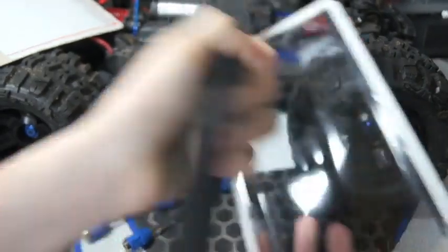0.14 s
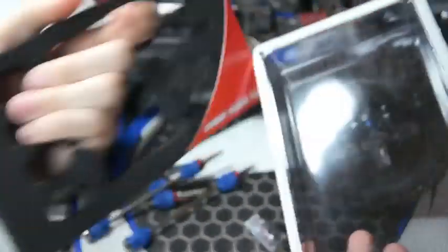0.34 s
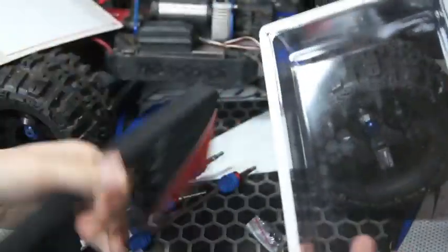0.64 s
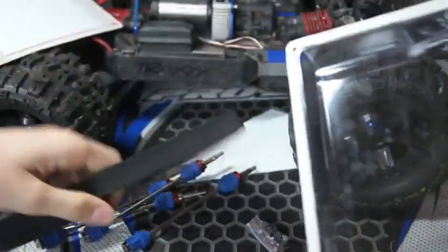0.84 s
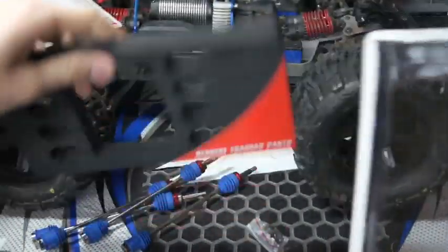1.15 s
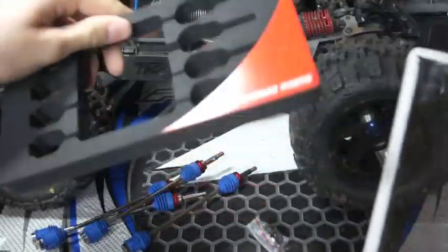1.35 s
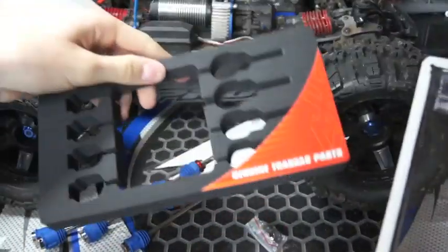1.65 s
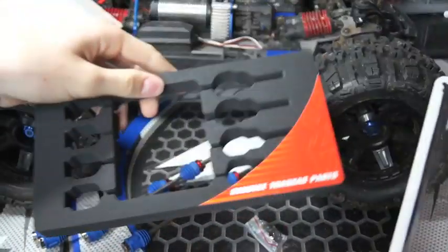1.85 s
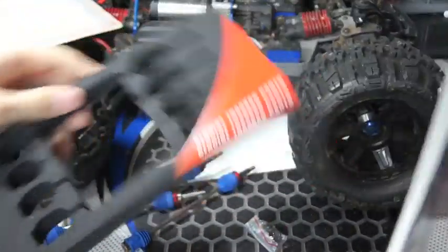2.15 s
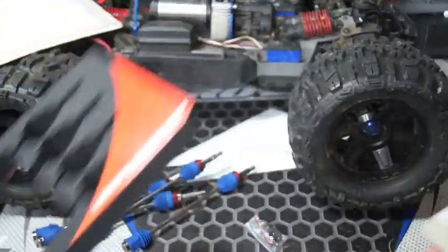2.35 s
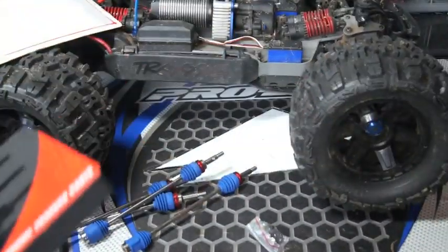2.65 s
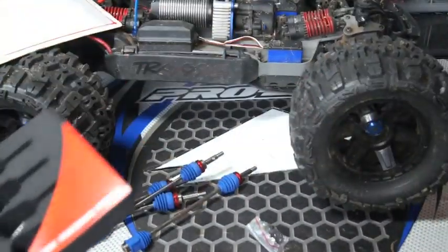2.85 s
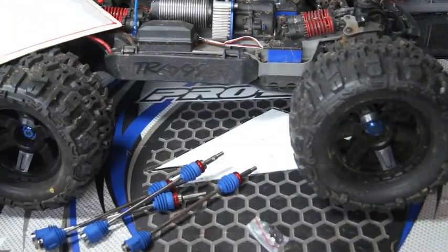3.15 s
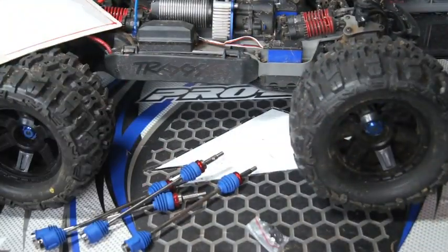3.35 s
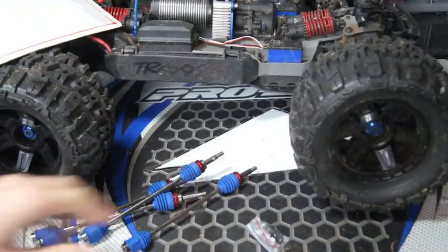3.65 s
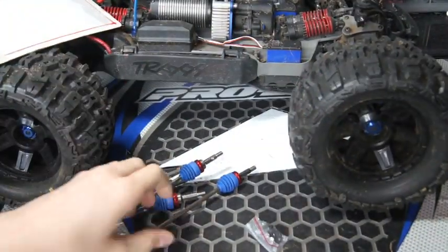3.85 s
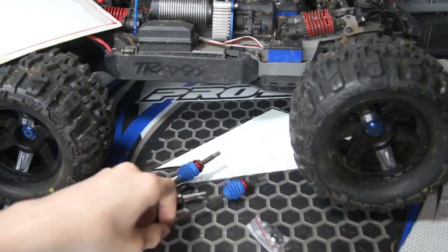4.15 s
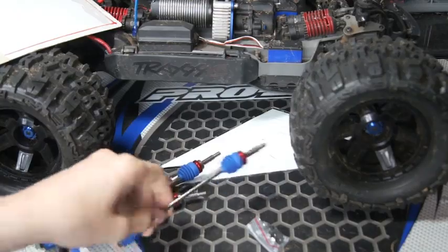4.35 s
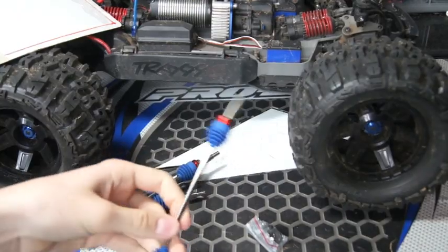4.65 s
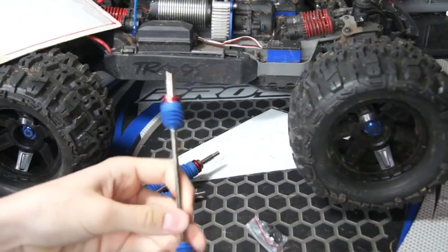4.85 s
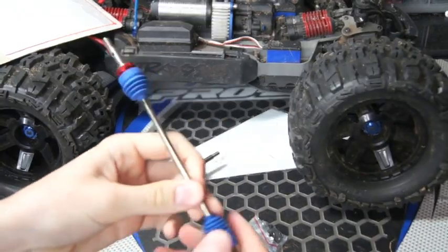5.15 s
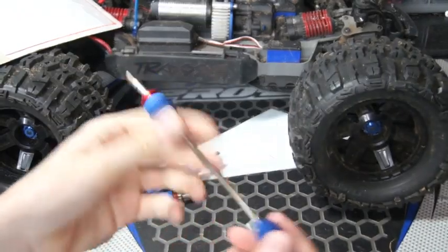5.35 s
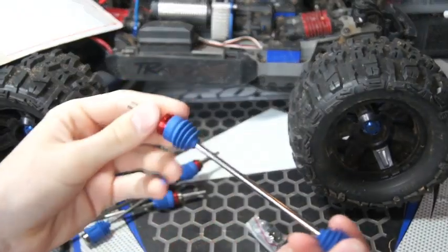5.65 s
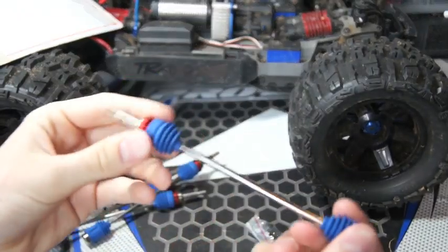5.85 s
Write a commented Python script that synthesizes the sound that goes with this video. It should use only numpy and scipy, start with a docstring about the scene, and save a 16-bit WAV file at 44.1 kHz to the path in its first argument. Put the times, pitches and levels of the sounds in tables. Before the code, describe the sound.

Hands slide a foam tray from a thin plastic cover, small mechanical clicks follow, then the cover drops with a loud clatter and rattles still.

```python
"""Faint fan-like air, hiss, hum and thin electrical whine run throughout a small, quiet room.
From 0.16 s hands slide a foam tray out of a plastic cover: grainy noise, taps, and cracks with ringing modes.
From 0.22 s a close mechanism, likely the camera's focus drive, clicks, whirs (fluttering noise) and bumps.
At 3 s the cover drops, flexes and puffs out air, then rocks to rest in shrinking, weakening contacts.
From 4.95 s the focus hunts in short rough whines; near 5.7 s the grip shifts dully on a steel shaft."""
import sys
import numpy as np
from scipy import signal
from scipy.fft import rfft, irfft
from scipy.io import wavfile
from scipy.ndimage import uniform_filter1d

SR = 44100
rng = np.random.default_rng(int(sys.argv[2]) if len(sys.argv) > 2 else 0)


def file_out(sig):
    """Save sig as 16-bit WAV at sys.argv[1]."""
    # one column per channel
    cols = np.atleast_2d(sig).T
    # limit, then scale
    lim = np.clip(cols, -1, 1)
    pcm = np.round(lim * 32767).astype(np.int16)
    wavfile.write(sys.argv[1], SR, pcm)


N = 264600
TIME_S = np.arange(N) / SR
HIT_SIZE = 8192  # samples
HIT_TIME_S = np.arange(HIT_SIZE) / SR


def amp(db):
    """Decibels to gain."""
    return 10 ** (np.asarray(db) / 20)


def unit(x):
    """Scales to an rms of one."""
    return x / np.sqrt(np.mean(x ** 2) + 1e-20)


def read(points, hz):
    """Reads a table on a log-frequency axis."""
    point_hz, value = np.transpose(points)
    return np.interp(np.log(hz + 1), np.log(point_hz + 1), value)


def pan(right_db):
    """Gains of the two channels; right_db is right minus left."""
    return amp(np.array([[-right_db], [right_db]]) / 2)


def add(mix, start_s, sound):
    """Mixes a sound in at start_s."""
    part = mix[:, max(round(start_s * SR), 0):][:, :sound.shape[-1]]
    part += sound[..., :part.shape[1]]


def bass_cut(x, hz, order=4):
    """Small, light parts radiate almost no bass."""
    return signal.sosfilt(signal.butter(order, hz, "highpass", fs=SR, output="sos"), x)


def slow_wobble(size, window):
    """Smoothed unit-rms noise that drives uneven motion."""
    return unit(uniform_filter1d(rng.standard_normal(size), size=window))


def dying(t_s, t60_s):
    """A decay of 60 dB in t60_s."""
    return np.exp(-np.log(1000) * np.maximum(t_s, 0) / np.maximum(t60_s, 1e-3))


# left-right likeness of noise: pitch_hz, likeness_share
LIKENESS = [(40, 0.32), (130, 1), (600, 0.85), (1000, 0.78), (1700, 0.093), (3000, 0.23), (7000, 0.027)]


def noise(spectrum, size, tilt_db=0, likeness=1):
    """Two channels of coloured noise, more alike in the bass than in the treble; tilt in dB per octave."""
    hz = np.fft.rfftfreq(size, 1 / SR)
    left, other = np.exp(2j * np.pi * rng.random((2, len(hz))))
    same = np.clip(likeness * read(LIKENESS, hz), 0, 1)
    right = same * left + np.sqrt(1 - same ** 2) * other
    octaves = np.log2(np.clip(hz, 500, 8000) / 1000)
    gain = amp(read(spectrum, hz) + tilt_db * octaves)
    return unit(irfft(np.array([left, right]) * gain, size))


def burst(spectrum, t60_s, tilt_db=0, likeness=1, bass_hold=0.21):
    """A contact: dense vibration with a very fast onset; its treble dies sooner than its bass."""
    hz, t_s, bands = signal.stft(noise(spectrum, HIT_SIZE, tilt_db, likeness), SR, nperseg=128)
    band_t60_s = t60_s * ((hz[:, None] + 300) / 1500) ** -bass_hold
    x = signal.istft(bands * dying(t_s, band_t60_s), SR, nperseg=128)[1]
    t_s = np.arange(x.shape[1]) / SR
    x = x * (1 - np.exp(-t_s / 0.00026))
    return x * np.linalg.norm(dying(t_s, t60_s)) / np.linalg.norm(x)


# echo decay: pitch_hz, t60_s
ROOM_DECAY = [(100, 0.4), (400, 0.44), (1000, 0.42), (3000, .36), (8000, 0.44), (15000, .17)]


def room(x):
    """Diffuse echoes from nearby walls, each band dying at its own speed."""
    hz, t_s, bands = signal.stft(noise([(20, 0), (20000, 0)], size=32768), SR, nperseg=256)
    tail = signal.istft(bands * dying(t_s, read(ROOM_DECAY, hz)[:, None]), SR, nperseg=256)[1]
    tail = tail * np.clip(np.arange(tail.shape[1]) / SR / 0.01, 0, 1) ** 2
    return signal.fftconvolve(x, tail / np.linalg.norm(tail[0]), axes=1)[:, :N]


# air and hiss spectrum: pitch_hz, relative_level_db_per_hz
FLOOR_SPECTRUM = [(25, -13.5), (100, -24), (170, -9.5), (240, -1), (470, 2.5), (700, -1), (1070, 0),
                  (1300, -13.5), (2100, -10.5), (3000, -13.5), (4200, -12), (5400, -17), (10000, -25.5),
                  (15000, -33)]
FLOOR_DB, HUM_HZ, HUM_RMS_DB = -53.5, 122, -82.5


def room_tone():
    """Steady fan-like air and hiss as coloured noise, plus a trace of mains hum as a sine."""
    air = amp(FLOOR_DB) * pan(0.3) * noise(FLOOR_SPECTRUM, N, likeness=0.86)
    return air + amp(HUM_RMS_DB) * np.sqrt(2) * np.sin(2 * np.pi * HUM_HZ * TIME_S)


# electrical whine bands: pitch_hz, width_hz, level_db, right_minus_left_db
WHINE_BANDS = [(1780, 70, -73.5, 3.5), (2215, 150, -69, 11.5), (3782, 34, -75, -12), (4206, 41, -69, 1.5),
               (4510, 65, -71, 2)]


def whine():
    """Thin bands of hiss from nearby electronics, unrelated at the two microphones."""
    hz = np.fft.rfftfreq(N, 1 / SR)
    white = np.exp(2j * np.pi * rng.random((2, len(hz))))
    out = np.zeros((2, N))
    for band_hz, width_hz, db, right_db in WHINE_BANDS:
        band = irfft(white / (1 + ((hz - band_hz) / width_hz) ** 2), N)
        out += amp(db) * pan(right_db) * unit(band)
    return out


SPEED_UP_SHARE = 0.59  # share of a stroke spent gathering speed


def strokes(rows):
    """Loudness of rubbing: each stroke gathers speed and slows again in a bell shape."""
    share = np.where(TIME_S < np.array(rows)[:, :1], SPEED_UP_SHARE, 1 - SPEED_UP_SHARE)
    bells = zip(rows, share)
    return sum(amp(db) * np.exp(-((TIME_S - peak_s) / (length_s * part)) ** 2)
               for (peak_s, length_s, db), part in bells)


# foam and skin on plastic: pitch_hz, relative_level_db_per_hz
RUB_SPECTRUM = [(150, -27), (400, -12), (900, -0.5), (1800, 0.5), (3000, 4), (4800, 5), (7500, -5.5),
                (13000, -8.5), (16000, -32)]


def crackle(snaps_per_s=450, spread_db=5, kinds=6):
    """Foam cells catch and let go: tiny snaps, a few of them large."""
    size_db = spread_db * np.minimum(rng.exponential(size=N), 2.8)
    snaps = (rng.random(N) < snaps_per_s / SR) * amp(size_db)
    kind = rng.integers(0, kinds, N)
    out = np.zeros((2, N))
    for k in range(kinds):
        snap = burst(RUB_SPECTRUM, 0.023, bass_hold=0.3)
        out += signal.oaconvolve((snaps * (kind == k))[None], snap, axes=1)[:, :N]
    return unit(out)


# foam and skin strokes: peak_speed_s, length_s, level_db
SLIDE_STROKES = [(.162, 0.056, -41.5), (.235, 0.093, -46), (.40, 0.15, -56.5), (.51, 0.063, -48),
                 (.935, 0.044, -58.5), (1.08, 0.23, -56), (1.39, 0.035, -56), (1.505, .07, -58),
                 (3.46, 0.18, -59.5), (3.558, 0.048, -58.5), (3.77, 0.13, -65.5), (4.06, 0.39, -59.5)]
# finger and shaft taps: start_s, level_db, brightness_db_per_octave
LIGHT_TAPS = [(.250, -45, 26), (.757, -42, 3), (1.965, -44, -10), (3.391, -42.5, 3), (3.957, -42.5, -5),
              (4.915, -47, 4), (4.958, -43.5, -1)]
# hard contact, for taps and focus clicks: pitch_hz, relative_level_db_per_hz
CLICK_SPECTRUM = [(100, -56), (250, -10.5), (480, -7), (900, 4), (1300, -6.5), (2000, -1.5), (2900, 1),
                  (4200, -4), (6000, -18.5), (10000, -26), (14000, -38)]
# grip shifts on the shaft: peak_speed_s, length_s, level_db
GRIP_SHIFTS = [(5.68, 0.3, -59.5), (5.98, 0.082, -49)]
# dull rub on shaft and rubber boot: pitch_hz, relative_level_db_per_hz
GRIP_SPECTRUM = [(40, -27), (130, -9), (350, 3), (700, 1), (1100, 2), (1800, -13), (4000, -24), (7000, -23),
                 (14000, -43)]


def hands(grain_db=2, wet_db=-9, tap_t60_s=0.057, grip_grain_db=1.0):
    """Grainy noise and snaps for sliding, single bursts for taps, slower dull noise for the grip."""
    rub = unit(noise(RUB_SPECTRUM, N) * amp(grain_db * slow_wobble(N, 90)))
    out = (rub + crackle()) * strokes(SLIDE_STROKES)
    slips = slow_wobble(N, 400)  # skin sticks and slips more slowly than foam
    out += unit(noise(GRIP_SPECTRUM, N) * amp(grip_grain_db * slips)) * strokes(GRIP_SHIFTS)
    for start_s, db, tilt_db in LIGHT_TAPS:
        add(out, start_s, amp(db) * bass_cut(burst(CLICK_SPECTRUM, tap_t60_s, tilt_db), hz=180))
    return out + amp(wet_db) * room(out)


# sheet crack: pitch_hz, relative_level_db_per_hz
CRACK_SPECTRUM = [(30, -23), (120, -75), (230, -27), (430, -8.5), (800, -3.5), (1050, -0.5), (1250, -5),
                  (1900, -5), (3000, -5), (4500, -10), (7500, -22), (13000, -31), (16000, -46.5)]


def on_spot(spot_hz, lift_db=7, octaves=0.16):
    """The crack spectrum, raised round the pitch of the spot that is struck."""
    hz = np.geomspace(20, 20000, 120)
    lift = lift_db * np.exp(-(np.log2(hz / spot_hz) / octaves) ** 2)
    return np.transpose([hz, read(CRACK_SPECTRUM, hz) + lift])


def from_right(x, delay_s=.00005):
    """Sound from the right reaches the left microphone late and with less treble."""
    hz = np.fft.rfftfreq(N, 1 / SR)
    shadow_db = -3 * hz ** 2 / (hz ** 2 + 1800 ** 2)
    left = irfft(rfft(x[0]) * amp(shadow_db) * np.exp(-2j * np.pi * hz * delay_s), N)
    return np.array([left, x[1]])


# blows on the cover: start_s, level_db, brightness_db_per_octave, spot_hz, crack_t60_s
COVER_BLOWS = [(0.1583, -23, 7.5, 4130, .04), (.162, -30, -4, 845, 0.097), (0.2162, -18.5, -1, 1010, .028),
               (.234, -28, -5.5, 980, 0.066), (0.304, -31, 0, 2840, 0.037), (2.842, -39.5, 0.5, 944, .035),
               (2.9923, -21, 19, 3770, 0.046), (2.995, -5.5, 0, 870, 0.041),
               (3.0083, -8.5, 1.5, 2960, 0.037), (3.0122, -7.5, -1.5, 3050, 0.11),
               (3.021, -12, -3.5, 950, .1), (3.029, -15, -2, 980, 0.14), (3.058, -18, -5, 990, 0.094),
               (3.105, -23, -4.5, 997, 0.14)]
# modes of the cover: pitch_hz, level_db, t60_s
COVER_MODES = [(244, -23, 0.11), (445.6, -1.5, 0.086), (525, -17, 0.083), (728, -17, 0.15),
               (749, 3.5, 0.062), (820, -8, 0.04), (876, 4.5, 0.11), (954, 2, 0.23), (1074, -0.5, 0.16),
               (1110, -21.5, .06), (1280, -9, 0.078), (1634, -8, 0.11), (1791, -2, 0.058),
               (1952, -1.5, 0.081), (2540, -17.5, 0.026), (2820, -17, 0.064), (3120, -19.5, 0.065)]
# until let go, the hand damps the cover and holds it near the microphones
LET_GO_S = 2.9
HELD_RING_DB, HELD_ROOM_DB, FREE_RING_DB, FREE_ROOM_DB = -27, -10.5, -21.5, -7
RING_GROWTH = 0.67  # dB of ringing per dB of blow: hard blows go mostly into the crack


def cover(right_db=-0.1, port_delay_s=.0001, mode_scatter_db=2, flex_wet_db=-12):
    """Each blow cracks the thin sheet and rings its modes, in a new mix for each blow; panels flex too."""
    direct, to_room = np.zeros((2, 2, N))
    t_s = HIT_TIME_S
    hz, mode_db, t60_s = np.transpose(COVER_MODES)[:, :, None]
    sign = (-1) ** np.arange(len(hz))[:, None]  # neighbouring modes swing in opposite directions
    envelope = sign * dying(t_s, t60_s) * (1 - np.exp(-t_s / 0.00034))
    modes = np.array([envelope * np.sin(2 * np.pi * hz * (t_s - lag_s)) for lag_s in (port_delay_s, 0)])
    for start_s, db, tilt_db, spot_hz, crack_t60_s in COVER_BLOWS + rocking():
        held = start_s < LET_GO_S
        ring_db, wet_db = (HELD_RING_DB, HELD_ROOM_DB) if held else (FREE_RING_DB, FREE_ROOM_DB)
        mix_db = mode_db + mode_scatter_db * rng.standard_normal(hz.shape)
        ring = (modes * amp(mix_db)).sum(1)
        crack = burst(on_spot(spot_hz), crack_t60_s, tilt_db)
        blow = amp(db) * crack + amp(ring_db + RING_GROWTH * db) * ring
        add(direct, start_s, blow)
        add(to_room, start_s, amp(wet_db) * blow)
    panels = flexes()
    wet = room(to_room + amp(flex_wet_db) * panels)
    return pan(right_db) * bass_cut(from_right(direct + panels + wet), hz=207)


# panels flexing around the time of some blows: start_s, pitch_hz, level_db, full_swing_s
PANEL_FLEXES = [(0.2151, 900, -18.5, 0.0032), (.230, 818, -29.5, 0.008), (2.9933, 738, -5.5, 0.0028),
                (3.0078, 2630, -9.5, 0.0039), (3.0093, 2980, -13, 0.0054), (3.015, 1074, -8.5, 0.012)]
# each panel drags the whole shell along, lower and more slowly
SHELL_HZ, SHELL_DB, SHELL_SLOWER = 442.7, -10.5, 1.15
# rocking contacts flex a panel too; dB relative to the contact, scatter as a share of pitch
ROCK_FLEX_DB, ROCK_SWELL_S, ROCK_PITCH_SCATTER = -4, .0022, .1


def flexes(port_delay_s=.0001):
    """A whole panel swings up and settles as a swelling sine, and the shell follows."""
    out = np.zeros((2, N))
    t_s = HIT_TIME_S
    lagged_s = t_s - np.array([[port_delay_s], [0]])
    rocks = []
    for start_s, db, _, spot_hz, _ in rocking():
        panel_hz = spot_hz * (1 + ROCK_PITCH_SCATTER * rng.standard_normal())
        rocks.append((start_s, panel_hz, db + ROCK_FLEX_DB, ROCK_SWELL_S))
    for start_s, panel_hz, panel_db, panel_swell_s in PANEL_FLEXES + rocks:
        panel = (panel_hz, panel_db, panel_swell_s)
        shell = (SHELL_HZ, panel_db + SHELL_DB, panel_swell_s * SHELL_SLOWER)
        for hz, db, swell_s in (panel, shell):
            swing = (t_s / swell_s * np.exp(1 - t_s / swell_s)) ** 3
            add(out, start_s, amp(db) * swing * np.sin(2 * np.pi * hz * lagged_s))
    return out


# modes of the drive housing: pitch_hz, level_db, t60_s
HOUSING_MODES = [(495, -17, 0.12), (674, -14, 0.027), (950, -7, 0.032), (1720, -5, 0.012),
                 (1998, -10.5, 0.035), (2816, -1.5, .022), (2890, -4, 0.026), (4200, -7, 0.009),
                 (4600, -22, 0.0092)]


def focus_click(lead_s=.007, scrape_db=-9, snap_db=-2.5, t60_s=0.036, ring_db=-1, after_db=-16,
                right_db=0.8, port_delay_s=0.00013):
    """The drive scrapes for a moment, snaps free and rings the housing; returns lead_s and the sound."""
    out = np.zeros((2, SR // 4))
    add(out, 0, amp(scrape_db) * burst(CLICK_SPECTRUM, 0.091, tilt_db=4.0, likeness=0.28))
    snap = amp(snap_db) * burst(CLICK_SPECTRUM, t60_s, likeness=0.22, bass_hold=0.27)
    after = amp(after_db) * burst(CLICK_SPECTRUM, 0.21, tilt_db=-5.0, likeness=0.14)
    add(out, lead_s, snap + after)
    since_s = np.maximum(HIT_TIME_S - np.array([[port_delay_s], [0]]), 0)
    for k, (hz, db, mode_t60_s) in enumerate(HOUSING_MODES):
        gain = (-1) ** k * amp(ring_db + db + 2 * rng.standard_normal((2, 1)))
        envelope = dying(since_s, mode_t60_s) * (1 - np.exp(-since_s / 0.00047))
        add(out, lead_s, gain * np.sin(2 * np.pi * hz * since_s) * envelope)
    return lead_s, pan(right_db) * bass_cut(out, hz=176)


# drive whir and gear buzz: pitch_hz, relative_level_db_per_hz
WHIR_SPECTRUM = [(200, -27), (450, -1), (1000, -1), (1600, -15.5), (2500, -4.5), (2850, 2), (3400, -3.5),
                 (4400, -4), (5200, -15), (14000, -30.5)]
BUMP_FROM_HZ, BUMP_TO_HZ, BUMP_WOBBLE = 490, 385, .085  # wobble: rms share of pitch


def focus_bump(length_s=.03, buzz_db=-5, buzz_peak_s=0.0086, right_db=10):
    """Braking: the gears buzz briefly, while the housing shudders in a sinking, uneven tone."""
    size = int(length_s * SR)
    uneven = slow_wobble(size, 160)
    hz = np.geomspace(BUMP_FROM_HZ, BUMP_TO_HZ, size) * (1 + BUMP_WOBBLE * uneven)
    shudder = np.sin(2 * np.pi * np.cumsum(hz) / SR) * signal.windows.tukey(size, .7) * amp(uneven - 2.0)
    u = np.arange(size) / SR / buzz_peak_s
    buzz = amp(buzz_db) * noise(WHIR_SPECTRUM, size, tilt_db=-2.5) * u * np.exp(1 - u)
    return pan(right_db) * shudder + pan(3.8) * buzz


# focus moves: start_s, click_db, stop_s, bump_db, whir_db
FOCUS_MOVES = [(.218, -50, .352, -40.5, -55), (.561, -24.5, .784, -43, -54),
               (0.932, -44.5, 1.106, -41, -65), (1.747, -22.5, 1.890, -40, -58),
               (2.598, -23.5, 2.768, -40, -56.5), (4.000, -23, 4.028, -41.5, -51.5),
               (4.132, -23.5, 4.181, -40, -52.5), (4.632, -23, 4.668, -42, -54),
               (5.193, -39, 5.238, -43, -52.5), (5.535, -50, 5.605, -60, -52.5)]


def focus_drive(flutter_db=2.5):
    """Click, a thin fluttering noise whir while the lens travels, and a bump."""
    out = np.zeros((2, N))
    for start_s, click_db, stop_s, bump_db, whir_db in FOCUS_MOVES:
        lead_s, click = focus_click()
        add(out, start_s - lead_s, amp(click_db) * click)
        size = max(int((stop_s - start_s + .012) * SR), 256)
        level_db = whir_db + np.linspace(2, -3, size) + flutter_db * slow_wobble(size, 300)
        whir = pan(3.0) * noise(WHIR_SPECTRUM, size) * signal.windows.tukey(size, .2)
        add(out, start_s, amp(level_db) * whir)
        add(out, stop_s, amp(bump_db) * focus_bump())
    return out


def air_puff(start_s=2.997, db=-58, swell_s=0.018):
    """The falling sheet pushes out a faint, deep puff of air: swelling low noise."""
    out = np.zeros((2, N))
    u = HIT_TIME_S / swell_s
    deep = noise([(15, -4), (70, 3), (110, -5), (300, -50), (16000, -90)], HIT_SIZE)
    add(out, start_s, amp(db) * deep * u * np.exp(1 - u))
    return out


# gaps shrink toward the last one; the far edge slaps down after each contact
ROCK_START_S, ROCK_FIRST_GAP_S, ROCK_LAST_GAP_S, ROCK_SHRINK = 3.128, .042, .0205, .45
FAR_EDGE_S, FAR_EDGE_DB, FAR_EDGE_BRIGHT_DB_PER_OCTAVE = .014, -5.5, -2  # delay and level after the contact
# level peaks ROCK_PEAK_S after the start, then loses ROCK_FADE_DB in ROCK_FADE_S, slowly at first
ROCK_PEAK_S, ROCK_DB, ROCK_FADE_DB, ROCK_FADE_S, ROCK_FADE_POWER = .036, -18, -14.5, .15, 1.77
ROCK_BRIGHT_DB_PER_OCTAVE, ROCK_DULLING_PER_S = 3, -31  # first brightness, and its change
ROCK_SPOT_HZ, ROCK_T60_S = 980, .034


def rocking(count=9):
    """Contacts of the cover as it rocks to rest, as rows like those of COVER_BLOWS."""
    gaps_s = ROCK_LAST_GAP_S + (ROCK_FIRST_GAP_S - ROCK_LAST_GAP_S) * ROCK_SHRINK ** np.arange(count)
    rows = []
    for age_s in np.cumsum(gaps_s) - gaps_s:
        start_s = ROCK_START_S + age_s
        db = ROCK_DB + ROCK_FADE_DB * (abs(age_s - ROCK_PEAK_S) / ROCK_FADE_S) ** ROCK_FADE_POWER
        bright_db = ROCK_BRIGHT_DB_PER_OCTAVE + ROCK_DULLING_PER_S * age_s
        rows.append((start_s, db, bright_db, ROCK_SPOT_HZ, ROCK_T60_S))
        rows.append((start_s + FAR_EDGE_S, db + FAR_EDGE_DB, FAR_EDGE_BRIGHT_DB_PER_OCTAVE,
                     ROCK_SPOT_HZ, ROCK_T60_S))
    return rows


HUNT_START_S, HUNT_EVERY_S = 4.951, .1
HUNT_FIRST_LENGTH_S, HUNT_LAST_LENGTH_S, HUNT_FIRST_DB, HUNT_LAST_DB = 0.038, .07, -55, -59.5


def focus_nudges(step_hz=2010, width_hz=170, fall_db=-3.5, right_db=2.0, count=10):
    """Motor runs at a steady beat, ever longer and weaker: noise on four multiples of the step rate."""
    hz = np.arange(100, 10000, 20)
    lines = sum(amp(fall_db * (k - 1) ** 2.1) / (1 + ((hz - k * step_hz) / width_hz) ** 2) for k in range(1, 5))
    spectrum = np.transpose([hz, 20 * np.log10(lines)])
    out = np.zeros((2, N))
    runs = np.linspace((HUNT_FIRST_LENGTH_S, HUNT_FIRST_DB), (HUNT_LAST_LENGTH_S, HUNT_LAST_DB), count)
    for k, (length_s, db) in enumerate(runs):
        size = int(length_s * SR)
        run = noise(spectrum, size) * signal.windows.tukey(size, .5)
        add(out, HUNT_START_S + k * HUNT_EVERY_S, amp(db) * run)
    return pan(right_db) * out


def scene():
    """All sources at the two microphones."""
    return room_tone() + whine() + hands() + cover() + focus_drive() + air_puff() + focus_nudges()


# dips cut by the camera body round the microphones: pitch_hz, width_hz, level_db
BODY_DIPS = [(607, 42, -9), (1372, 96, -5), (2382, 120, -12.5), (3432, 178, -8)]
EDGE_HZ = 15800


def record(dry):
    """The hollow, causal (minimum-phase) colour of the microphone ports; then the band limit."""
    hz = abs(np.fft.fftfreq(4096, 1 / SR))
    dips_db = sum(db * np.exp(-((hz - dip_hz) / width_hz) ** 2) for dip_hz, width_hz, db in BODY_DIPS)
    log_gain = np.log(amp(dips_db))
    ports = np.fft.ifft(np.exp(np.conj(signal.hilbert(log_gain)))).real
    coloured = signal.oaconvolve(dry, ports[None], axes=1)[:, :N]
    band_limit = signal.firwin(401, EDGE_HZ, window=("kaiser", 9), fs=SR)
    return signal.oaconvolve(coloured, band_limit[None], "same")


dry = scene()
out = record(dry)
file_out(out)
```